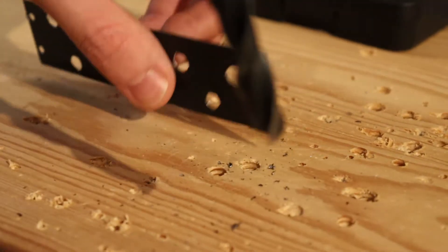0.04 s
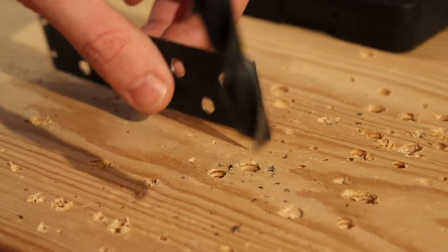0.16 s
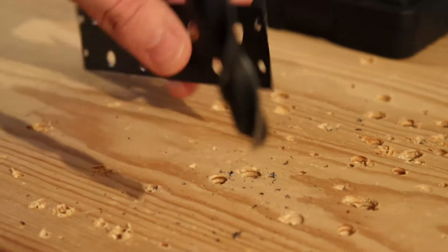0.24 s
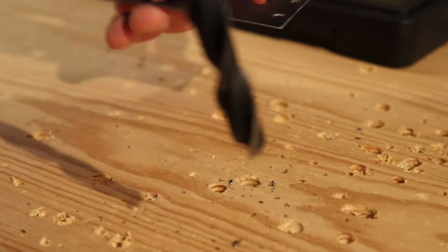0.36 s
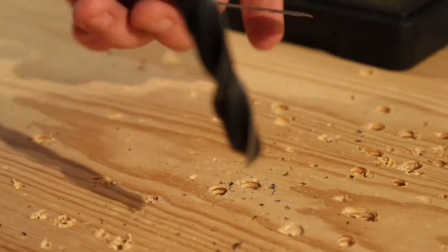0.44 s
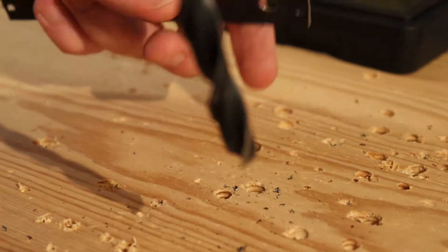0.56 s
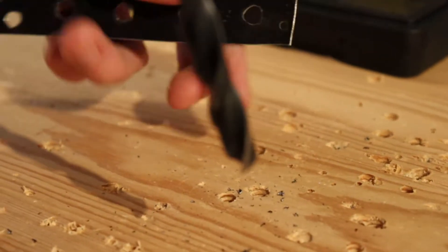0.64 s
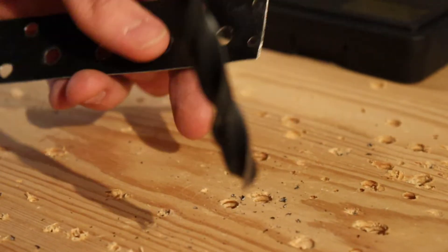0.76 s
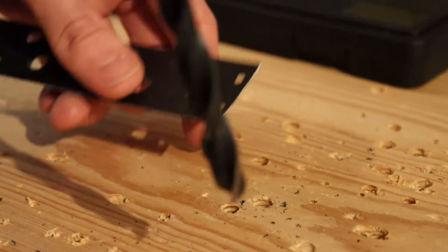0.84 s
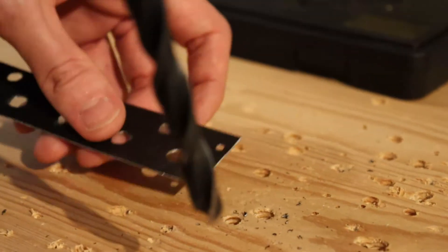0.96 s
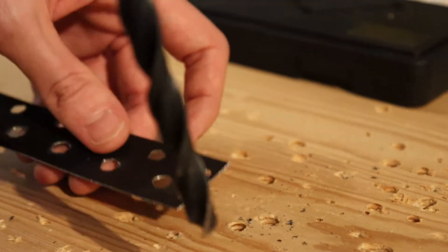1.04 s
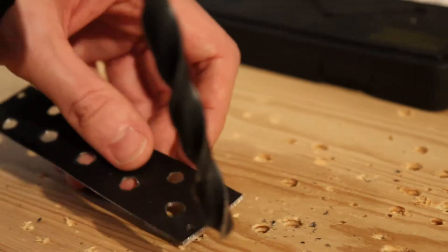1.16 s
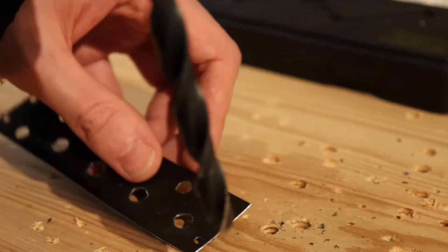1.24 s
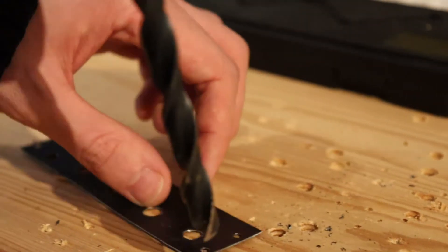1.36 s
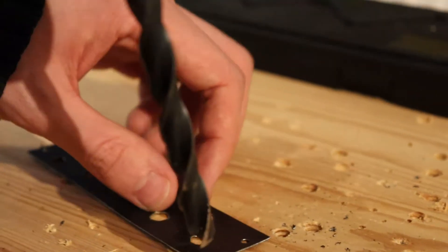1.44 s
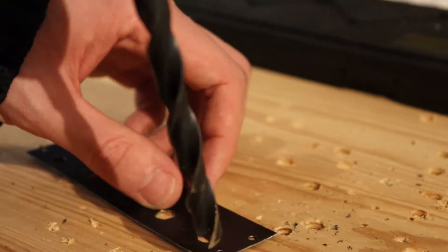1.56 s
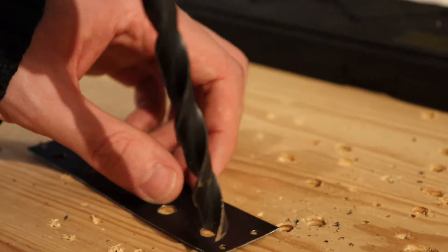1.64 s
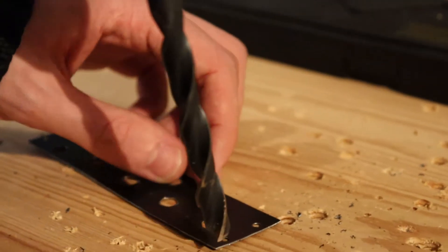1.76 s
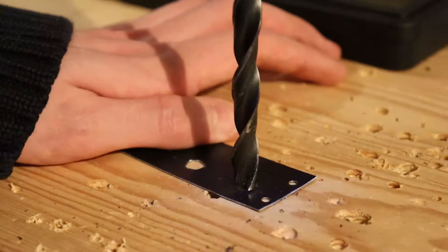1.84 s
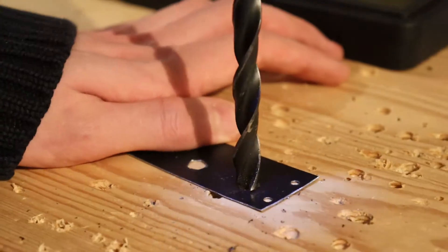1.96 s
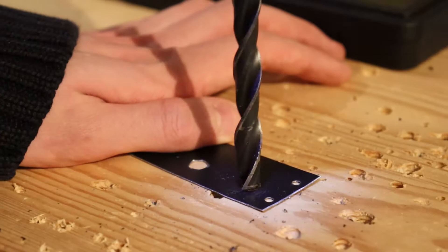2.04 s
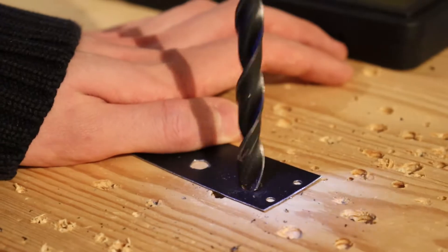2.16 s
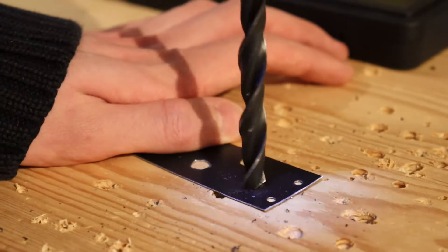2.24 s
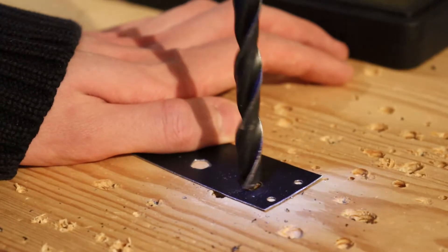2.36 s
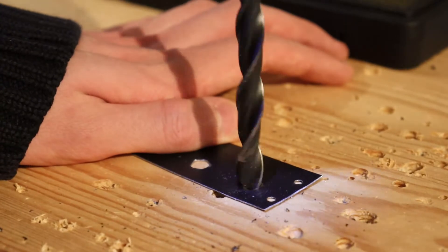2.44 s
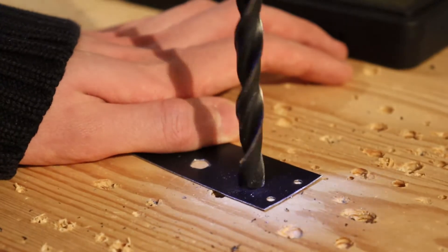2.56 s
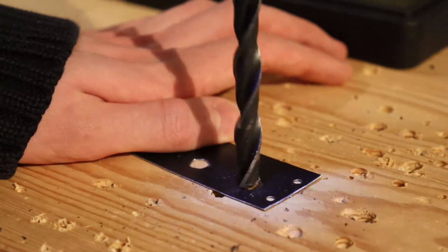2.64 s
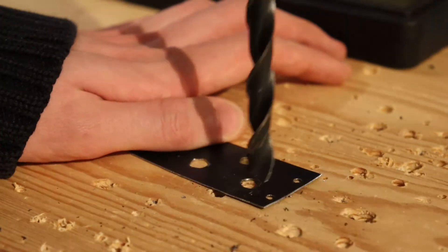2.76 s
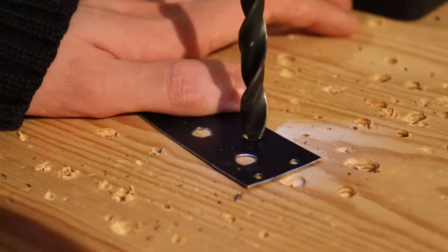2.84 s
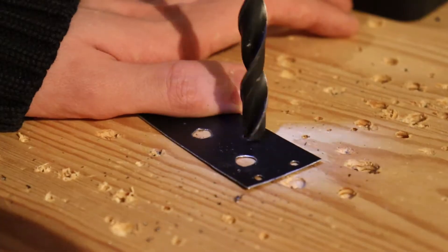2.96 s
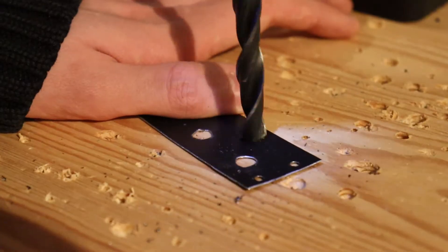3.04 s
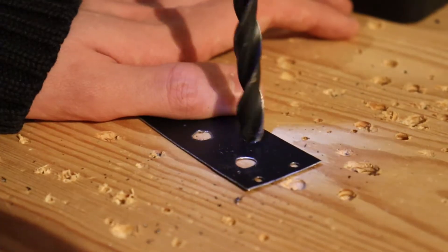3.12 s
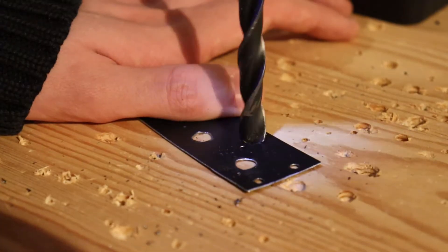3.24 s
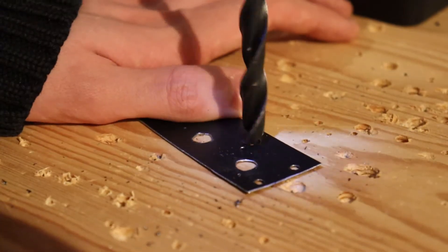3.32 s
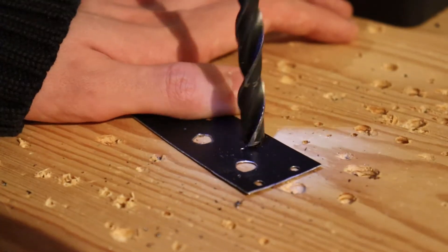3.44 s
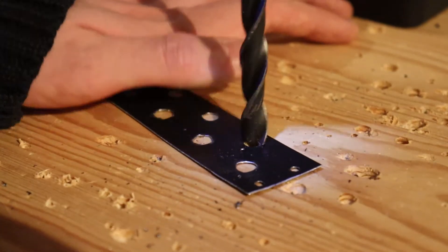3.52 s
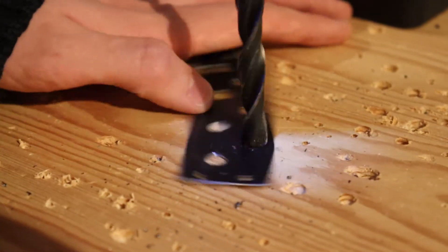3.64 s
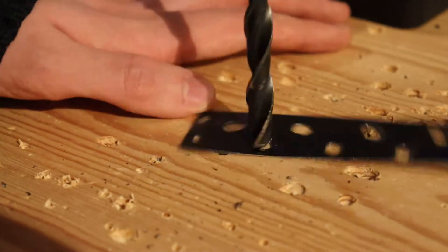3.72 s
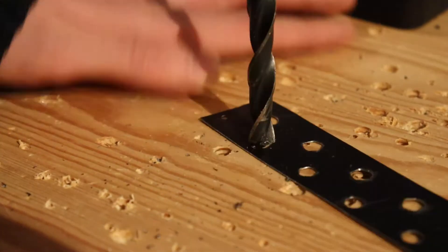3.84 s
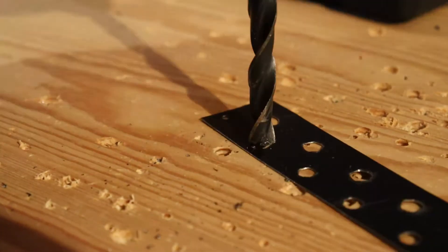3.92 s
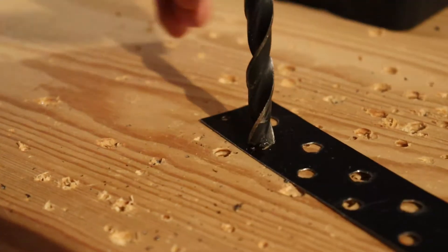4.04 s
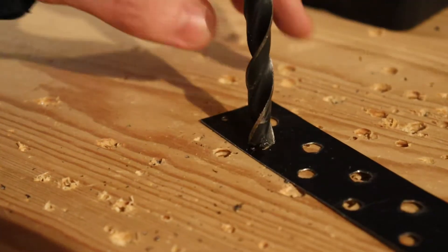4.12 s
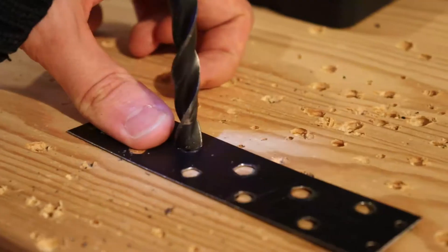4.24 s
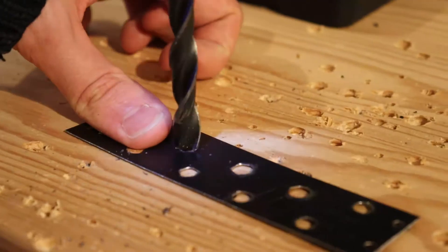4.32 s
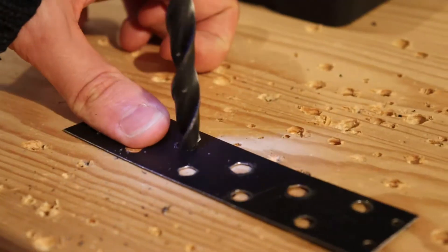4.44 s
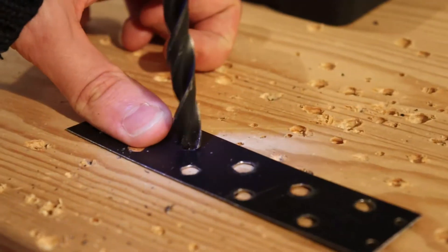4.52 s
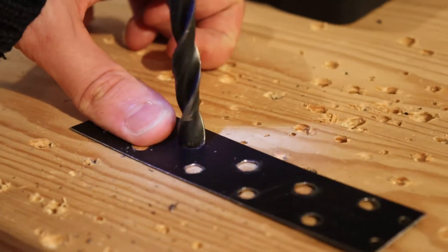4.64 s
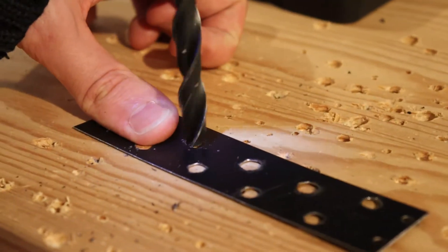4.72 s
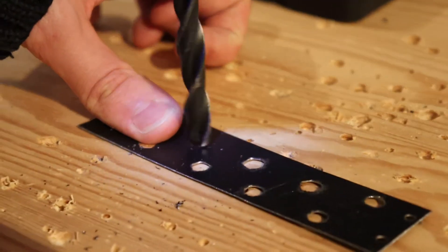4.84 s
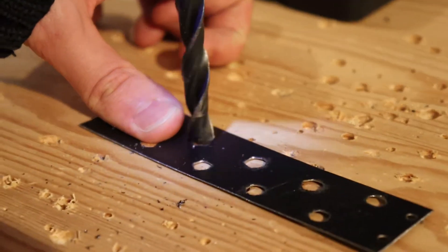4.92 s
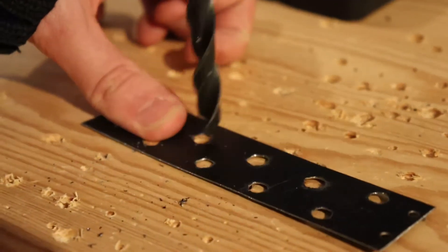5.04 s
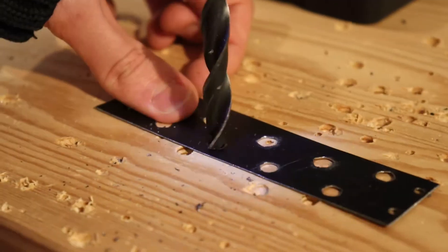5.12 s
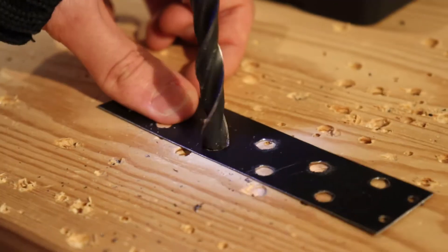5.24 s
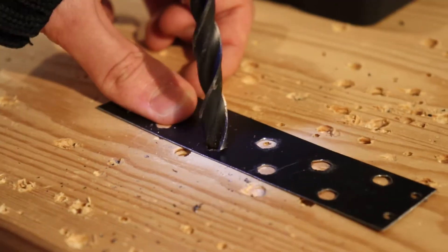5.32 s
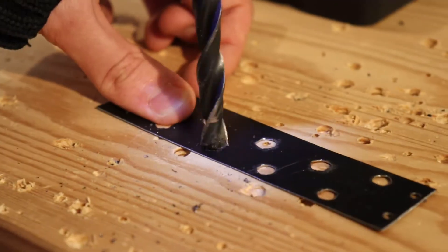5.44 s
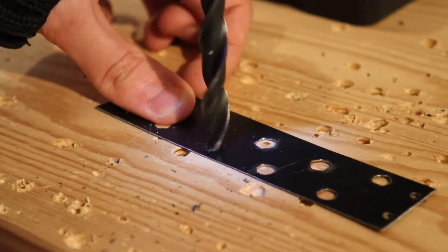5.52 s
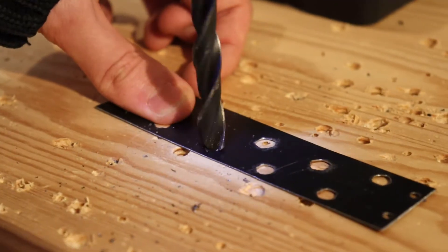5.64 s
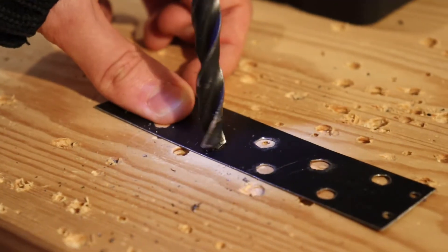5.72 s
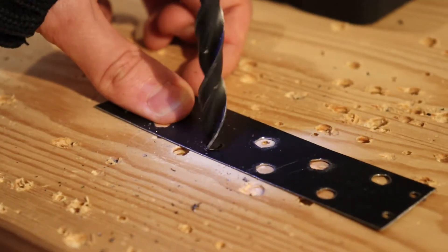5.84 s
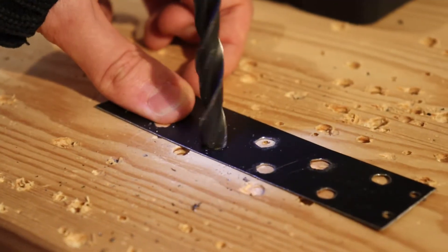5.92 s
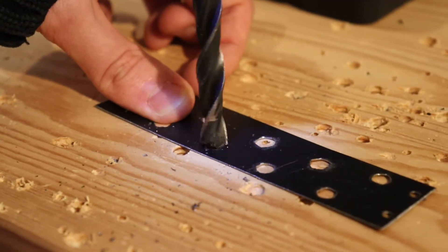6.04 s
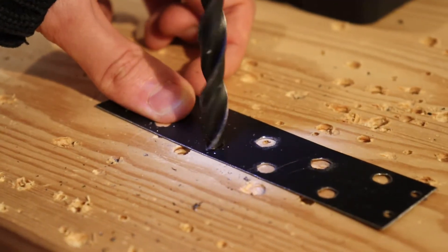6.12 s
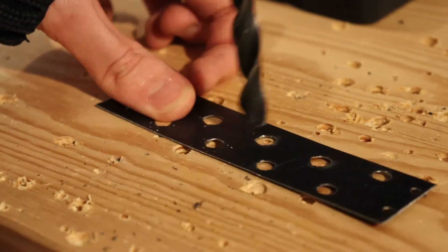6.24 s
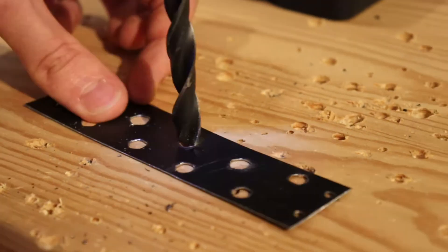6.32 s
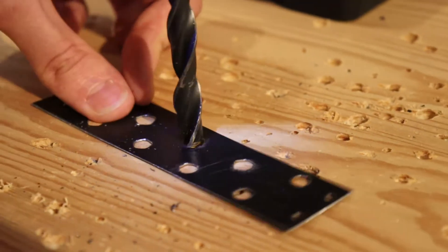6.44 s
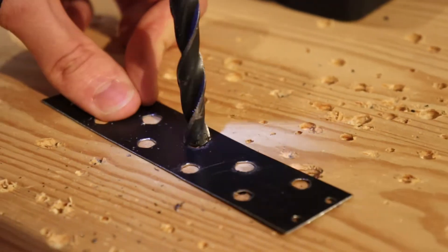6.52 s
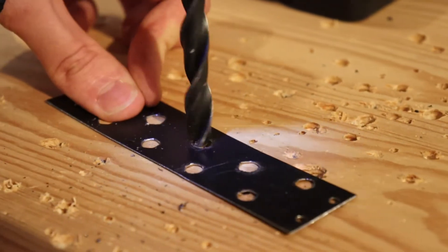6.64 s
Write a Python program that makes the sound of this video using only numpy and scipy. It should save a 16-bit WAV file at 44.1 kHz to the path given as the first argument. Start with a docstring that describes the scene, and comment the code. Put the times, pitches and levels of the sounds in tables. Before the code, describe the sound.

Close stereo view in a small workshop. A thin metal strip clanks and twangs, is handled softly, then laid on a wooden bench. A cordless drill whines in short bursts, its pitch stepping up, with gear rattle and gritty scraping. After the second burst the strip is snatched with a brief rising groan, skids and knocks down hard; three more bursts follow with small clicks and knocks.

```python
"""A cordless drill deburrs holes in a perforated steel strip on a wooden bench, in five short bursts.
Its speed controller sings as stepped tones; random grains through filters make gears, scrape and chatter.
Between bursts the strip is handled and set down: noise puffs ring bench and steel modes.
Once the bit snatches the strip with a rising stick-slip groan and flings it round.
A small workshop answers with a noise tail, over low hum and soft hiss."""
import sys
import numpy as np
from scipy import signal
from scipy.fft import rfft, irfft, next_fast_len
from scipy.io import wavfile
from scipy.ndimage import uniform_filter1d, map_coordinates

SR = 44100
rng = np.random.default_rng(int(sys.argv[2]) if len(sys.argv) > 2 else 0)


def file_out(sig):
    """Save sig as 16-bit WAV at sys.argv[1]."""
    # one column per channel
    cols = np.atleast_2d(sig).T
    # limit, then scale
    lim = np.clip(cols, -1, 1)
    pcm = np.round(lim * 32767).astype(np.int16)
    wavfile.write(sys.argv[1], SR, pcm)


N = 294147

# Spectra are relative levels; mode levels are relative, ahead of the body's treble roll-off.
# room air: (frequency [Hz], level [dB])
AIR_SPECTRUM = [(22, -27), (45, -15.5), (83, -7.5), (122, -8.5), (165, -7.5), (300, -10.5), (520, -23),
                (770, -21.5), (1760, -39), (8000, -40), (14000, -41), (16000, -46)]
# soft hiss: (frequency [Hz], level [dB])
HISS_SPECTRUM = [(300, 1), (700, 3.5), (1500, -2), (4300, -6), (6000, -13), (15000, -21)]
# low rumble: (frequency [Hz], level [dB])
RUMBLE_SPECTRUM = [(22, -6), (45, -4), (130, 1), (300, -16), (800, -60)]
# a low hum comes and goes: (time [s], length [s], level [dB])
HUMS = [(.4, .65, -66.5), (1.4, 0.57, -63)]
# the hiss swells while the strip is moved: (time [s], length [s], level [dB])
HISSES = [(.75, 1.13, -68)]
# a low rumble swells near the end: (time [s], length [s], level [dB])
RUMBLES = [(6.25, .6, -57.5)]
# stereo likeness: (frequency [Hz], left-right correlation [1])
LIKENESS = [(100, 0.96), (600, .99), (1400, .94), (2800, 0.82), (5000, 0.78), (9000, 0.48), (14000, 0.28)]
# room decay: (frequency [Hz], t60 [s])
ROOM_T60 = [(200, 0.28), (1000, 0.36), (3500, 0.27), (5000, 0.35), (7000, 0.16), (12000, 0.12)]

# strip on bench and bit: (time [s], thud pitch [Hz], thud [dB], bending [dB], clank [dB],
# hard-edge lift [dB], tick [dB], room relative to knock [dB])
KNOCKS = [(-.02, 790, -39, -53, -28, 7, -42.5, -2.5), (.159, 775, -31, -34.5, -22, 4, -36, -11.5),
          (.268, 890, -47.5, -68, -72, 0, -70, -16), (.295, 880, -44.5, -67, -70, 0, -72, -16),
          (.314, 860, -44, -58, -49, 5, -66, -16), (.966, 890, -61, -68, -54, 9, -59, -10),
          (1.276, 800, -53.5, -50, -47.5, -3, -53.5, -9), (1.408, 800, -55, -49.5, -59, -6, -55, 3),
          (1.425, 770, -43, -36.5, -31.5, 1, -36.5, -13), (1.434, 700, -42, -38, -40, -4, -40.5, -9),
          (1.805, 640, -64, -51.5, -80, 0, -86, -12), (3.716, 900, -47, -53, -28.5, 1, -44, -3),
          (3.941, 730, -40, -44, -39.5, -15, -53, -5.5), (3.981, 554, -30.5, -45, -48, -10, -72, -17),
          (4.048, 398, -24, -25, -26.5, -7, -49.5, -12.5), (4.082, 500, -30, -35, -44, -3, -76, -27),
          (4.114, 473, -39.5, -52, -64, 0, -74, -20), (4.143, 543, -38, -54, -64, 0, -82, -27),
          (4.514, 550, -34.5, -38, -50, 0, -56, -20), (5.363, 585, -35.5, -34.5, -44, 2, -40, -22),
          (5.605, 560, -30, -33, -37, 3, -51, -27), (5.996, 545, -36, -31, -40, 0, -56, -23),
          (6.296, 520, -45.5, -54, -47.5, -11, -80, -8), (6.471, 567, -36, -39.5, -35, 6, -48, -16)]
# thud: (multiple of its pitch [1], level [dB])
THUD_SPECTRUM = [(.05, -42), (.3, -19.5), (.55, -10.5), (.8, -4), (1, 3), (1.4, -5), (2.2, -8.5),
                 (4, -28.5), (7, -48)]
# clank: (frequency [Hz], level [dB])
CLANK_SPECTRUM = [(30, -42), (150, -18), (430, -12), (640, 3), (1300, 3), (2100, 1), (3200, -5.5),
                  (4400, -11.5), (6000, -27), (12000, -64)]
# contact tick: (frequency [Hz], level [dB])
TICK_SPECTRUM = [(1500, -40), (4000, 4.5), (6500, 1.5), (9000, -1.5), (13000, -6.5), (16000, -12)]
# strip lying on the bench: (frequency [Hz], width [Hz], level [dB])
BENCH_MODES = [(201.6, 15, -7.5), (232, 24, -13.5), (319.5, 20.5, -6.5), (427, 37, -3.5), (545.4, 26.7, 1),
               (617.8, 19.5, 1.5), (671, 49, -2), (747, 12, -7.5), (880, 50, -2)]
# hand-damped steel strip: (frequency [Hz], width [Hz], level [dB])
STRIP_MODES = [(1390, 28, -12), (1527, 34, 7), (1735, 85, 10), (1940, 57, 9.5), (2230, 43, -33),
               (2580, 120, 6), (3290, 210, 6.5), (3610, 100, -2.5)]
# thin high overtones of the steel: (frequency [Hz], width [Hz], level [dB])
PING_MODES = [(3750, 28, 5), (5437, 35, -12), (6288, 30, 10), (7430, 24, -1), (8000, 23, -16),
              (8560, 51, 17), (13820, 24, -7)]
# loosely held strip flexing: (frequency [Hz], mean level [dB], t60 [s])
BENDING_MODES = [(641.4, 8, 0.07), (562, -24, 0.25), (1376, -8.5, 0.17), (1960, -13, 0.13)]
# fingers slide along the strip: (time [s], length [s], level [dB])
RUBS = [(.63, 0.036, -71), (.685, 0.077, -62), (.765, .035, -62)]
# trigger, spindle lock and breaking burrs: (time [s], click [dB], body relative to click [dB])
SNAPS = [(1.903, -46, -3.5), (2.065, -33, 2), (2.779, -35, -23), (2.796, -49.5, 9), (2.819, -44, -19),
         (2.944, -48, 2.5), (3.802, -40, -3), (3.809, -35.5, 0.5), (3.835, -44, 6), (4.298, -52.5, 0),
         (4.514, -50, 7), (5.074, -36.5, -17), (5.102, -44, -2.5), (5.203, -41.5, 0.5), (5.498, -51, -2),
         (6.268, -37, -16), (6.345, -41.5, -6.5), (6.44, -47, -16), (6.469, -37.5, 5)]

# one row per squeeze: (five rising trigger notches [s] x 5, full speed [s], easing off [s],
# switch open [s], whine under load [Hz])
SQUEEZES = [(1.906, 1.934, 1.959, 1.994, 2.037, 2.130, 2.732, 2.762, 4586),
            (2.822, 2.848, 2.867, 2.897, 2.937, 3.054, 3.780, 3.798, 4587),
            (4.172, 4.173, 4.202, 4.280, 4.327, 4.374, 5.040, 5.065, 4594),
            (5.103, 5.127, 5.145, 5.168, 5.194, 5.243, 6.228, 6.256, 4606),
            (6.345, 6.359, 6.371, 6.388, 6.416, 6.497, 6.700, 6.720, 4598)]
# by trigger position, five notches, full, easing off: (whine [Hz]); the full-speed entry is not heard
NOTCH_HZ = [4150, 4350, 4322, 4350, 4406, 4610, 4375]
# by trigger position: (whine before the trims in RUNS [dB])
NOTCH_DB = [-46.5, -38.5, -40, -37, -34.5, -31.5, -38.5]
# one row per motor run: (start [s], run-down start [s], run-down of speed and depth [dB/s],
# bite time constant [s], chatter [dB], scrape [dB], whine trim below full [dB], at full and after [dB])
RUNS = [(2.02, 2.806, 1800, 0.13, -40, -45, 0, 0), (2.935, 3.828, 291, 0.29, -37, -42, -0.5, -1),
        (4.306, 5.084, 1800, 0.18, -38.5, -43.5, -5, -0.7),
        (5.177, 6.277, 1800, 0.24, -36.5, -44, -1.5, 0.3), (6.421, 6.72, 1800, 0.18, -37, -44, -1.5, -1)]
# drumming cut: (frequency [Hz], level [dB])
CHATTER_SPECTRUM = [(25, -29), (45, -9), (65, -14.5), (88, 0), (115, 2.5), (150, -9), (270, -5),
                    (375, -13.5), (440, -3.5), (630, 2.5), (900, -0.5), (1130, -19.5), (1500, -35),
                    (3000, -69)]
# gear teeth: (frequency [Hz], level [dB])
GEARS_SPECTRUM = [(400, -21.5), (950, 1), (1130, -0.5), (1460, 0.5), (1900, -7), (2160, -4.5), (2470, -7),
                  (2830, -1), (3040, -5.5), (3230, 0.5), (3600, -8.5), (4100, -26), (5500, -37),
                  (9000, -55)]
# scraping edges: (frequency [Hz], level [dB])
SCRAPE_SPECTRUM = [(3000, -32), (3900, 5.5), (5000, 3.5), (5800, 1), (6500, 1), (7500, -2), (8400, -0.5),
                   (10000, -2.5), (12000, -8), (13300, -5.5), (16000, -15.5)]
# the burr of the first hole rasps in its own band: (time [s], length [s], level [dB])
BURRS = [(2.08, 0.76, -43.5)]
# strip dragged or skidding on the bench: (time [s], length [s], drumming [dB], hiss [dB], fade [dB/s])
SKIDS = [(3.702, .15, -47.5, -54.5, 11), (3.855, 0.077, -47.5, -59, 90), (3.927, .115, -46.5, -55.5, 117),
         (4.048, 0.118, -42, -64.5, 71), (6.284, .14, -45, -87, 140)]
# strip binds on the bit and groans upward: (time [s], pitch [Hz], level [dB])
SNATCH = [(3.72, 379, -80), (3.745, 470, -38), (3.775, 596, -42), (3.8, 799, -32), (3.825, 1027, -35),
          (3.85, 1084, -78)]

TOP_HZ = 16100
AIR_WAVER_DB, LEAN_DB = 1.8, .7  # slow wavering of room air, and of the hand's pressure on the drill
CONTACT_T60_S = .006  # decay of the strip's contact with the wood
EDGE_HZ, EDGE_OCTAVES = 3800, 0.33  # centre and width of a hard edge's lift in the clank
FULL = 5  # trigger position of full speed
SAG_HZ, SAG_TAU_S = 54, .24  # whine sinks at full speed as the load builds
GEARS_DB, SPIN_UP_TAU_S = -40, 0.2  # gears at full speed
GEARS_POWER, CHATTER_POWER, SCRAPE_POWER = 0.74, 1.07, 1.3  # gain as a power of speed, depth, depth
CATCH_PER_S, CATCH_DB = 28, -10  # edge snags on the rim, relative to the gears
SKID_EDGE_S, SKID_RATTLE_DB = 0.0051, -14  # steel rattle relative to the drumming


def amp(db):
    """Decibels to gain."""
    return 10 ** (np.asarray(db) / 20)


def unit(x):
    """Scaled to rms 1."""
    return x / np.sqrt(np.mean(x ** 2) + 1e-20)


def struck(x, size=220):
    """Scaled so that the first samples have rms 1."""
    return x / np.sqrt(np.mean(x[..., :size] ** 2) + 1e-20)


def along(points, hz):
    """(Hz, value) points read on a log frequency axis."""
    f, value = np.transpose(points)
    return np.interp(np.log(hz + 1), np.log(f + 1), value)


def curves(rows):
    """One value per sample for each column after the time."""
    s, *columns = np.transpose(rows)
    return [np.interp(np.arange(N) / SR, s, column) for column in columns]


def gain(rows):
    """Gain from the last column (dB) of a curve, silent outside its rows."""
    t = np.arange(N) / SR
    inside = (t > rows[0][0]) & (t < rows[-1][0])
    return amp(curves(rows)[-1]) * inside


def swells(rows, edge_s):
    """Gain of (s, length s, dB) events that rise, hold and fall."""
    t = np.arange(N) / SR
    return sum(amp(db) * np.clip(np.minimum(t - s, s + length_s - t) / edge_s, 0, 1)
               for s, length_s, db in rows)


def wobble(knots_per_s):
    """A smooth random curve."""
    knots = rng.standard_normal(int(N * knots_per_s / SR) + 4)
    return map_coordinates(knots, [np.arange(N) * knots_per_s / SR])


def filtered(x, response):
    """x times a response of frequency."""
    n = x.shape[-1]
    m = next_fast_len(n + SR // 4)
    return irfft(rfft(x, m) * response(np.fft.rfftfreq(m, 1 / SR)), m)[..., :n]


def coloured(x, spectrum):
    """x through a causal minimum-phase filter with the given (Hz, dB) shape."""
    def response(hz):
        cepstrum = irfft(np.log(amp(along(spectrum, hz))))
        half = len(cepstrum) // 2
        return np.exp(rfft(np.r_[cepstrum[0], 2 * cepstrum[1:half], np.zeros(half)]))
    return filtered(x, response)


def resonate(x, modes):
    """x through a body's resonances, rolled off from an octave above the last mode."""
    top_hz = 2 * modes[-1][0]

    def response(f):
        ringing = sum((-1) ** k * amp(db) * 1j * f * width / (centre * centre - f * f + 1j * f * width)
                      for k, (centre, width, db) in enumerate(modes))
        return ringing / (1 + 1j * f / top_hz) ** 2
    return filtered(x, response)


def spread(pair):
    """Two unrelated signals become left and right: alike in the bass, less so in the treble."""
    def mid_side(hz):
        turn = np.arccos(np.clip(along(LIKENESS, hz), -1, 1)) / 2
        return np.array([np.cos(turn), np.sin(turn)])
    mid, side = filtered(pair, mid_side)
    return np.array([mid + side, mid - side])


def grains(per_s, scatter_db):
    """Two trains of tiny random impacts of uneven size."""
    hits = rng.random((2, N)) < per_s / SR
    signs = rng.choice([-1, 1], (2, N))
    return unit(hits * signs * amp(scatter_db * rng.standard_normal((2, N))))


def burst(spectrum, t60_s):
    """A stereo puff of dying noise whose attack has rms 1."""
    t = np.arange(SR // 2) / SR
    dying = rng.standard_normal((2, len(t))) * amp(-60 * t / t60_s)
    return struck(spread(coloured(dying, spectrum)))


def add(track, s, sound):
    """Mix a sound in at time s."""
    start = round(s * SR)
    part = sound[:, max(-start, 0):N - start]
    track[:, max(start, 0):][:, :part.shape[1]] += part


def nearby(x, echo_db, reach_s=.02, count=10):
    """Bench top, hands and tool case add quick echoes that ripple the spectrum."""
    delays_s, signs = rng.uniform(.001, reach_s, count), rng.choice([-1, 1], count)
    out = x.copy()
    for delay_s, sign in zip(delays_s, signs):
        add(out, delay_s, sign * amp(echo_db) * x)
    return unit(out)


def room(x, delay_s=.006):
    """The workshop's answer: a noise tail whose top treble dies soonest."""
    hz, t, z = signal.stft(rng.standard_normal((2, SR // 2)), SR, nperseg=256)
    decay = amp(-60 * t / along(ROOM_T60, hz)[:, None])
    tail = spread(signal.istft(z * decay, SR, nperseg=256)[1])
    tail = np.pad(tail / np.linalg.norm(tail[0]), ((0, 0), (int(delay_s * SR), 0)))
    return signal.fftconvolve(x, tail, axes=1)[:, :x.shape[1]]


def workshop(air_db=-61, hum_hz=82.9, hum_db=-73, hiss_db=-70):
    """Filtered-noise room air, hiss and late rumble, with a low hum wavering in pitch and level."""
    def noise(spectrum):
        return unit(spread(coloured(rng.standard_normal((2, N)), spectrum)))
    air = amp(air_db + AIR_WAVER_DB * wobble(12)) * noise(AIR_SPECTRUM)
    hum = np.sqrt(2) * np.sin(2 * np.pi * np.cumsum(hum_hz + 2.65 * wobble(7.2)) / SR)
    hum *= (amp(hum_db) + swells(HUMS, edge_s=0.17)) * amp(1.7 * wobble(9.9))
    hiss = (amp(hiss_db) + swells(HISSES, edge_s=0.16)) * noise(HISS_SPECTRUM)
    rumble = swells(RUMBLES, edge_s=.06) * noise(RUMBLE_SPECTRUM)
    return air + hum + hiss + rumble


def bend():
    """A twang: the strip's bending modes as decaying sines of slightly random level."""
    t = np.arange(SR // 2) / SR
    return struck(sum(amp(db + rng.normal(0, 0.67) - 60 * t / t60_s) * np.sin(2 * np.pi * hz * t)
                      for hz, db, t60_s in BENDING_MODES))


def hardened(edge_db):
    """The clank's spectrum, lifted around EDGE_HZ for a blow of the given hardness."""
    return [(hz, db + edge_db * np.exp(-(np.log2(hz / EDGE_HZ) / EDGE_OCTAVES) ** 2))
            for hz, db in CLANK_SPECTRUM]


def knocks(ring_db=-7, board_db=-3, ping_db=-13):
    """Each knock thuds in the bench, bends and clanks the steel and ticks at the contact."""
    out = np.zeros((2, N))
    for s, thud_hz, thud_db, bend_db, clank_db, edge_db, tick_db, room_db in KNOCKS:
        blow = np.array(THUD_SPECTRUM) * [thud_hz, 1]
        edge = hardened(edge_db)
        board = struck(resonate(burst(blow, t60_s=CONTACT_T60_S), BENCH_MODES), size=450)
        ring = struck(resonate(burst(edge, t60_s=0.004), STRIP_MODES), size=300)
        ping = struck(resonate(burst(TICK_SPECTRUM, t60_s=0.0087), PING_MODES), size=300)
        thud = burst(blow, t60_s=0.025) + amp(board_db) * board
        clank = burst(edge, t60_s=0.04) + amp(ring_db) * ring
        tick = burst(TICK_SPECTRUM, t60_s=0.013) + amp(ping_db) * ping
        sound = amp(thud_db) * thud + amp(bend_db) * bend()
        sound = sound + amp(clank_db) * clank + amp(tick_db) * tick
        add(out, s, sound + amp(room_db) * room(sound))
    return out


def fingers():
    """A faint dry rub of skin on steel: very uneven grains in the tick's band."""
    rub = spread(coloured(grains(per_s=2400, scatter_db=14), TICK_SPECTRUM))
    return swells(RUBS, edge_s=0.018) * nearby(rub, echo_db=-7)


def snaps(room_db=-12):
    """Short clicks from the tool and the burr: a tick puff and a longer clank puff."""
    out = np.zeros((2, N))
    for s, db, body_db in SNAPS:
        click = burst(TICK_SPECTRUM, t60_s=0.011)
        body = burst(CLANK_SPECTRUM, t60_s=0.031)
        add(out, s, amp(db) * (click + amp(body_db) * body))
    return out + amp(room_db) * room(out)


def whine(second_db=-14.0, third_db=-33, steady_db=-25, sagging_db=-27, flutter_db=0.58, waver_db=.5,
          jitter_hz=5, pan_db=0.8, blip_db=-2.0):
    """The controller chops the motor current and the windings sing, each notch at its own pitch and level."""
    t = np.arange(N) / SR
    notch = np.full(N, -1)
    blip, sag_hz, level_db = np.zeros((3, N))
    for (*times, loaded_hz), (*_, squeezing_db, running_db) in zip(SQUEEZES, RUNS):
        inside = (t >= times[0]) & (t < times[-1])
        notch[inside] = np.searchsorted(times, t[inside], side="right") - 1
        full_age = np.maximum(t[inside] - times[FULL], 0)
        sag_hz[inside] = loaded_hz + SAG_HZ * np.exp(-full_age / SAG_TAU_S)
        level_db[inside] = np.where(notch[inside] < FULL, squeezing_db, running_db)
        for s in (times[2], times[3], times[FULL]):  # pitch flicks up as the wiper crosses a contact
            blip[(t >= s) & (t < s + .004)] = 1
    on = uniform_filter1d(1. * (notch >= 0), size=40)
    full = uniform_filter1d(1. * (notch == FULL), size=40)
    blip = uniform_filter1d(blip, size=30)
    hz = np.where(notch == FULL, sag_hz, np.take(NOTCH_HZ, notch, mode="clip")) + 200 * blip
    hz = hz + jitter_hz * wobble(110)

    def tone(f):
        return np.sin(2 * np.pi * np.cumsum(f) / SR)
    # narrow current pulses at low speed are rich in overtones
    slow = amp(second_db + 2.7 * wobble(25)) * tone(2 * hz)
    slow += amp(third_db + 2.4 * wobble(25.6)) * tone(3 * hz)
    slow *= amp(-8 * (notch == FULL - 1))  # weaker as the pulses widen
    # full speed adds two thin lines: one steady, one sinking with the load
    steady_hz, sagging_hz = 9385, 9040 + 3.5 * (sag_hz - 4600)
    fast = amp(steady_db + 1.9 * wobble(30)) * tone(steady_hz + jitter_hz * wobble(60))
    fast += amp(sagging_db + 2.2 * wobble(30)) * tone(sagging_hz + 14 * wobble(48))
    level_db = uniform_filter1d(level_db + np.take(NOTCH_DB, notch, mode="clip"), size=400)
    level_db = level_db + waver_db * wobble(14) + blip_db * blip + flutter_db * wobble(150)
    sound = on * amp(level_db) * (tone(hz) + (1 - full) * slow + full * fast)
    return sound * amp([[pan_db], [-pan_db]]) + amp(-18.5) * room(sound[None])


def effort():
    """Gains of chatter, gears and scrape: motor spins up, bit bites in, all run down together."""
    t = np.arange(N) / SR
    chatter, gears, scrape = np.zeros((3, N))
    for start, stop, fall_db_per_s, bite_tau_s, chatter_db, scrape_db, *_ in RUNS:
        age = np.maximum(t - start, 0)
        coasting = amp(-fall_db_per_s * np.maximum(t - stop, 0))
        speed = (1 - np.exp(-age / SPIN_UP_TAU_S)) * coasting
        depth = (1 - np.exp(-age / bite_tau_s)) * coasting
        gears += amp(GEARS_DB) * speed ** GEARS_POWER
        chatter += amp(chatter_db) * depth ** CHATTER_POWER
        scrape += amp(scrape_db) * depth ** SCRAPE_POWER
    return chatter, gears, scrape


def skidding():
    """Gains of the skids' drumming and hiss: each starts fast, fades and stops short."""
    t = np.arange(N) / SR
    return sum(amp([[drum_db], [hiss_db]]) * swells([(s, length_s, 0)], SKID_EDGE_S)
               * amp(-fade_db_per_s * np.maximum(t - s, 0))
               for s, length_s, drum_db, hiss_db, fade_db_per_s in SKIDS)


def grinding(ring_db=-1, strip_db=-10):
    """Gear teeth rattle, edges scrape, and the bit's chatter drums through the strip into the bench."""
    chatter, gears, scrape = effort()
    skid, skid_hiss = skidding()
    chatter = chatter * amp(LEAN_DB * wobble(9)) + skid  # the hand leans unevenly on the drill
    gears, scrape = gears + amp(SKID_RATTLE_DB) * skid, scrape + skid_hiss
    bite = wobble(45)  # the edges catch and let go

    blow_grains = grains(per_s=1200, scatter_db=1.5) * amp(3.0 * bite)
    blows = unit(spread(coloured(blow_grains, CHATTER_SPECTRUM)))
    boom_grains = grains(per_s=500, scatter_db=4) * amp(1.55 * bite)
    boom = unit(spread(resonate(boom_grains, BENCH_MODES)))
    drum = unit(blows + amp(ring_db) * boom)

    tooth_grains = grains(per_s=2200, scatter_db=1.0) * amp(1.27 * bite + 1.3 * wobble(220))
    teeth = nearby(spread(coloured(tooth_grains, GEARS_SPECTRUM)), echo_db=-19.0)
    # as the contact wanders, each strip mode swells and fades on its own
    ring = unit(sum(resonate(grains(per_s=650, scatter_db=-2) * amp(5.6 * wobble(10)), [mode])
                    for mode in STRIP_MODES))
    catch_grains = grains(per_s=CATCH_PER_S, scatter_db=1.5)
    catches = nearby(spread(coloured(catch_grains, CLANK_SPECTRUM)), echo_db=0, reach_s=0.0074)
    rattle = teeth + amp(strip_db) * spread(ring) + amp(CATCH_DB) * catches

    swarf_grains = grains(per_s=10000, scatter_db=0.0) * amp(1.1 * bite + 1.25 * wobble(300))
    swarf = nearby(spread(coloured(swarf_grains, SCRAPE_SPECTRUM)), echo_db=-23.0)
    burr_modes = [(2000, 190, -2.2), (2210, 240, 0.37)]  # (frequency [Hz], width [Hz], level [dB])
    rasp = unit(spread(resonate(grains(per_s=400, scatter_db=1.5), burr_modes)))
    burr = swells(BURRS, edge_s=0.34) * amp(2.1 * bite) * rasp
    return chatter * drum + gears * rattle + scrape * swarf + burr


def snatch(overtone_db=-5, unevenness=0.087):
    """Stick and slip quicken as the bit grabs the strip: an unsteady rising tone and its octave."""
    hz = curves(SNATCH)[0] * (1 + unevenness * wobble(450))
    phase = 2 * np.pi * np.cumsum(hz) / SR
    groan = np.sin(phase) + amp(overtone_db) * np.sin(2 * phase)
    return gain(SNATCH) * amp(2.7 * wobble(160)) * groan


def scene():
    """Drill, strip and room together."""
    return workshop() + knocks() + fingers() + snaps() + whine() + grinding() + snatch()


def record(dry):
    """Band limit: nothing at or above TOP_HZ passes."""
    return filtered(dry, lambda hz: hz < TOP_HZ)


dry = scene()
out = record(dry)
file_out(out)
```